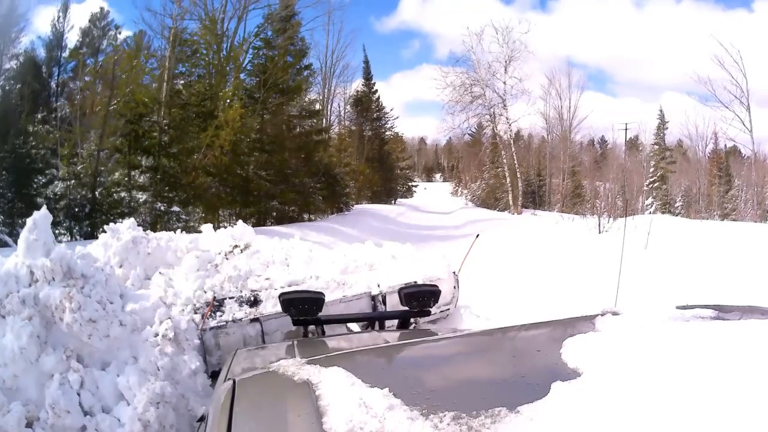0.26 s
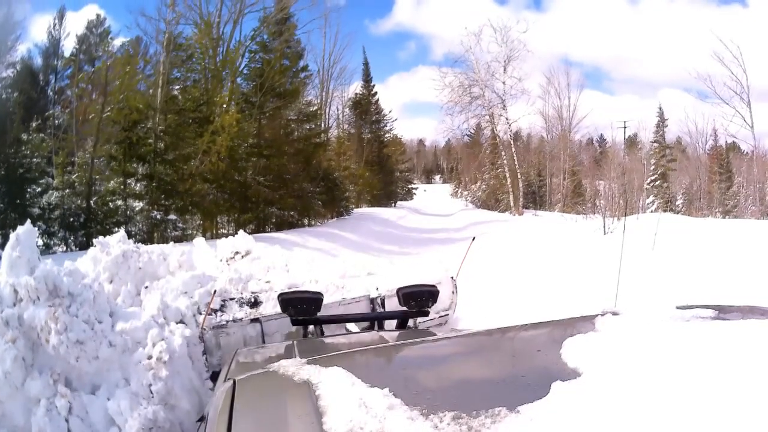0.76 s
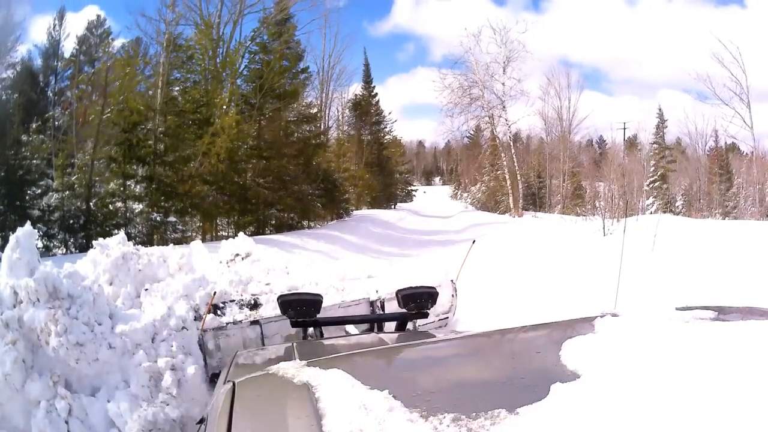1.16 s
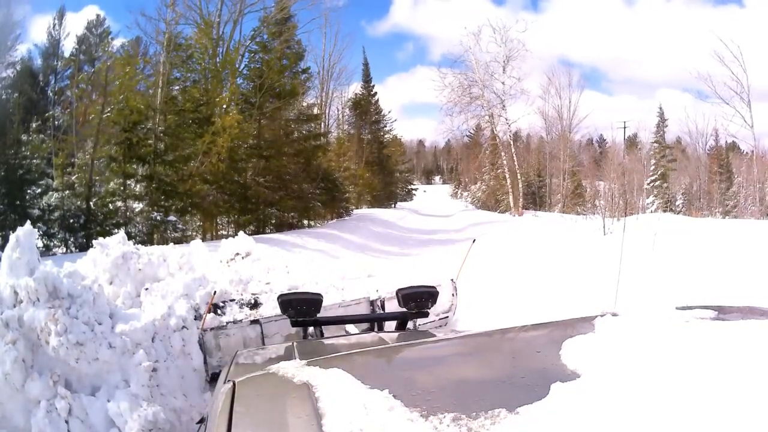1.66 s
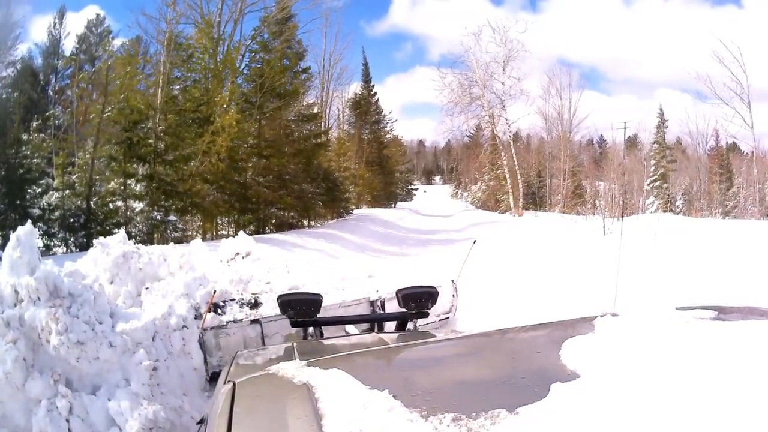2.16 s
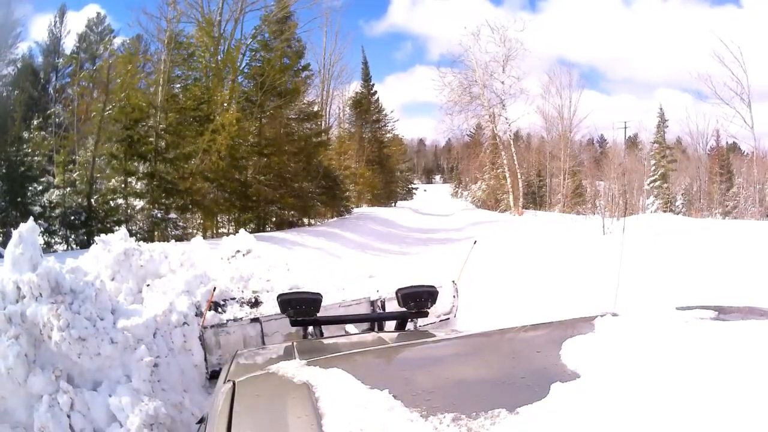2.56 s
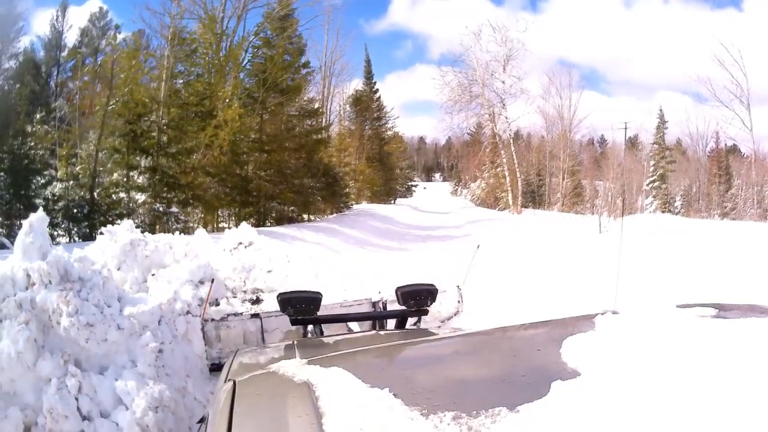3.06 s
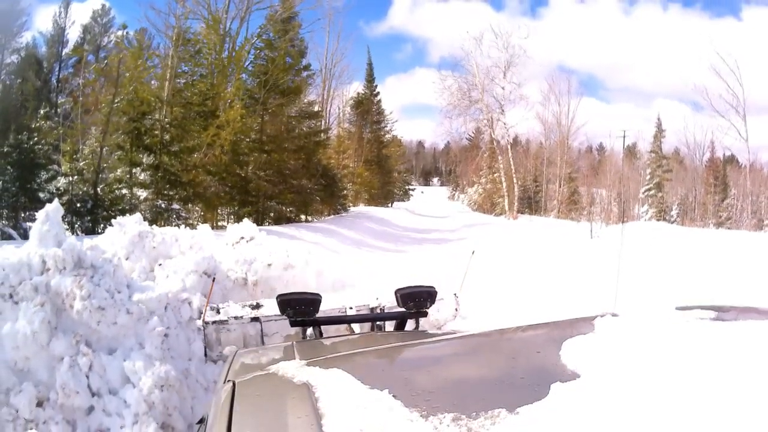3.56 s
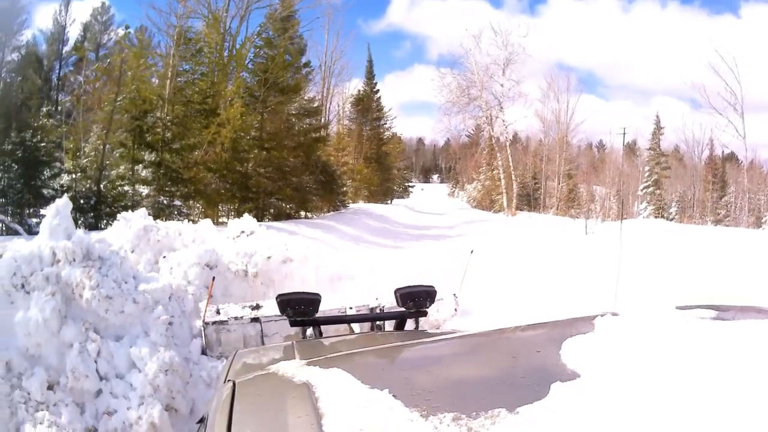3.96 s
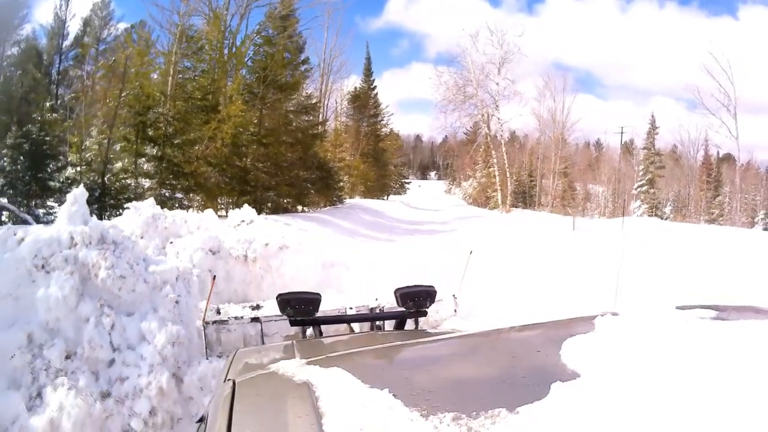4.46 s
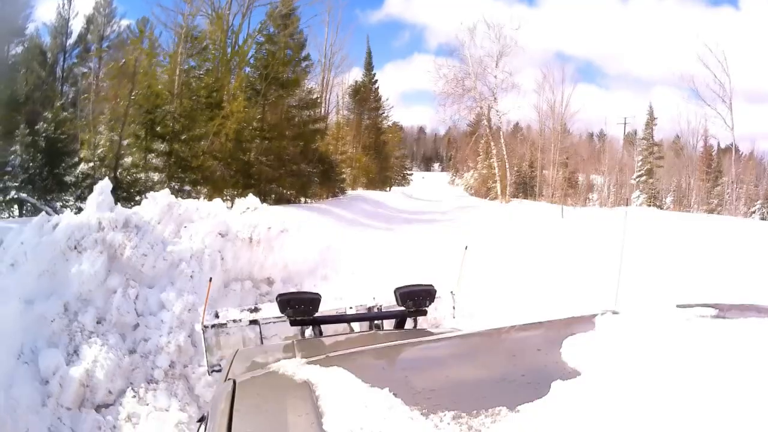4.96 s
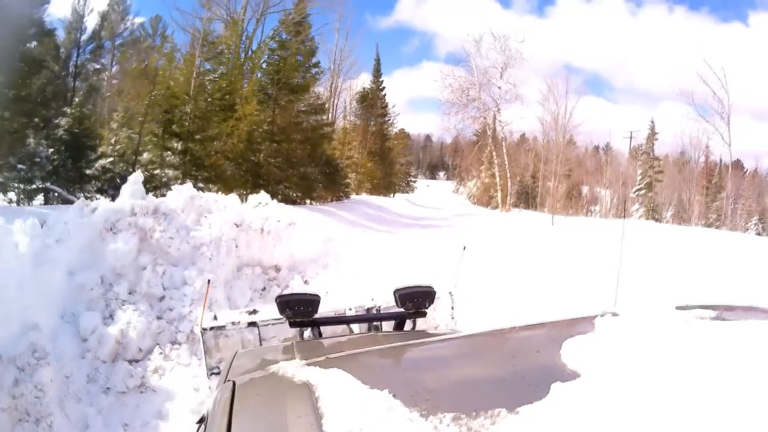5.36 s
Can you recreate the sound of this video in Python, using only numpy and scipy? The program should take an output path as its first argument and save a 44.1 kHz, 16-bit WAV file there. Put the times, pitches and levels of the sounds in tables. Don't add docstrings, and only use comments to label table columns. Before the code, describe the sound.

A truck engine booms under load in a cab while loose plow joints rattle, steel squeaks once, and wet snow thuds against the blade.

```python
import sys
import numpy as np
from scipy import signal
from scipy.fft import rfft, irfft
from scipy.io import wavfile
from scipy.ndimage import uniform_filter1d

SR = 44100
rng = np.random.default_rng(int(sys.argv[2]) if len(sys.argv) > 2 else 0)


def int16_out(signal):
    q = np.round(np.clip(np.atleast_2d(signal).T, -1, 1) * 32767)
    wavfile.write(sys.argv[1], SR, q.astype(np.int16))


def attenuation_scalar(level_db):
    decades = np.asarray(level_db, float) / 20
    return 10 ** decades


N = 247842

# (frequency [Hz], density [dB per Hz])
CAB_COLOUR = [(8.8, -27), (15, 1), (32, -4), (48, 2.5), (76, -7), (140, -8), (313, -9.5), (700, -38),
              (910, -51), (1540, -120)]


def evened(x):
    return x / np.sqrt(np.mean(x ** 2) + 1e-20)


def steadied(x, seconds):
    return evened(x / np.sqrt(uniform_filter1d((x ** 2).mean(0), int(seconds * SR)) + 0.067))


def lumps(seconds):
    width = int(seconds * SR)
    return evened(uniform_filter1d(uniform_filter1d(rng.standard_normal(N), width), width))


def unevenness(shape, width):
    return evened(uniform_filter1d(rng.standard_normal(shape), width))


def read(points, hz):
    f, value = np.transpose(points)
    return np.interp(np.log(hz + 1), np.log(f + 1), value)


def add(mix, s, sound):
    part = mix[:, round(s * SR):][:, :sound.shape[1]]
    part += sound[:, :part.shape[1]]


def resonate(x, hz, width):
    turn = np.exp(2j * np.pi * np.cumsum(hz * np.ones(x.shape[-1])) / SR)
    r = np.exp(-np.pi * width / SR)
    return 2 * (turn * signal.lfilter([1 - r], [1, -r], x / turn)).real


def pair(colour_db, size):
    # (frequency [Hz], left-right likeness [0 to 1])
    likeness = [(60, 0.95), (130, 0.8), (290, 0.83), (640, 0.47), (1410, 0.74), (3100, 0.61), (6820, 0.85),
                (15000, 1)]
    # (frequency [Hz], left over right [dB])
    balance = [(60, 3), (180, 0.7), (550, -4), (1650, -1), (4970, -0.69), (15000, 0.34)]
    hz = np.fft.rfftfreq(size, 1 / SR)
    a, b = rfft(rng.standard_normal((2, size)))
    same = np.clip(read(likeness, hz), 0, 1)
    ports = np.array([a, same * a + np.sqrt(1 - same ** 2) * b])
    ports = ports * attenuation_scalar(colour_db(hz) + [[.5], [-.5]] * read(balance, hz))
    return evened(irfft(ports, size))


def surges(rows):
    t = np.arange(0, N / SR + .002, .001)
    swell_db = sum(db * np.exp(-((t - s) / (0.8 * max(length, .01))) ** 2) for s, db, length in rows)
    return np.interp(np.arange(N) / SR, t, swell_db)


def controls():
    # (time [s], boom pitch [Hz], engine effort [dB], push against the snow [dB])
    load = [(0.0, 38.1, -21.5, -34.5), (0.5, 37.02, -18.5, -34), (0.95, 38.38, -17, -33.5),
            (1.38, 32.52, -18, -33), (1.52, 40, -15, -33.5), (1.77, 52.3, -15.5, -32),
            (2.0, 50.64, -15.5, -32), (2.2, 36, -19, -34), (2.5, 42.57, -14, -37.5),
            (2.83, 44.17, -18, -35.5), (2.99, 32.4, -16, -39.5), (3.24, 36.1, -15.5, -41),
            (3.37, 41.13, -17.5, -38.5), (3.94, 43.7, -19.5, -39.5), (4.269, 37.63, -23.5, -40),
            (4.65, 44.86, -27, -38), (4.93, 57.6, -24, -40.5), (5.62, 44.5, -22, -38.5)]
    # (time [s], extra boom [dB], length [s])
    lurches = [(.19, 8, 0.11), (.47, 6, .05), (.64, 3, .08), (.77, -2.5, 0.11), (1.22, 3, .15),
               (2.11, 9, 0.087), (2.5, 6, 0.054), (2.62, -0.5, 0.11), (2.92, 7.5, 0.075), (2.99, -5, 0.045),
               (3.09, 3.5, .06), (3.14, -7, .04), (3.24, 4.5, 0.043), (3.3, -9, .04), (3.38, 9.5, 0.11),
               (4.22, -9, .06), (4.52, -13, 0.061), (4.77, 4, 0.055), (4.84, -1, 0.053), (4.93, 2, .05),
               (4.98, -5, 0.047), (5.2, 4.5, 0.18), (5.48, 2.5, 0.084)]
    # (time [s], extra drumming [dB], length [s])
    slumps = [(.77, 1.5, 0.057), (1.1, 0.5, 0.15), (1.44, 6.5, 0.031), (1.98, 1, 0.065), (2.45, 5.5, 0.076),
              (2.6, 7, 0.12), (2.72, 5, 0.091), (2.83, 8, 0.099), (2.96, 7.5, .12), (3.13, 8, 0.07),
              (3.3, 5.5, 0.085), (3.7, 2.5, .08), (4.27, 2.5, 0.086), (4.55, 2.5, 0.088), (4.85, 5, 0.035),
              (5.48, 4.5, 0.062)]
    s, *columns = np.transpose(load)
    hz, effort_db, push_db = (np.interp(np.arange(N) / SR, s, c) for c in columns)
    heap_db = surges(slumps)
    boom_db = effort_db + surges(lurches)
    drum_db = push_db + 13.5 + heap_db
    drum_hz = 112 + 4 * heap_db
    clatter_db = push_db + .35 * heap_db
    return hz, boom_db, drum_db, drum_hz, clatter_db


def hiss():
    return attenuation_scalar(-61.0) * pair(lambda f: -30 * (f < 3000) - 1.64 * f / 1000, N)


def crumbs():
    out, t = np.zeros((2, N)), np.arange(1500) / SR
    for centre_hz in np.geomspace(600, 3500, 8):
        hits = rng.random(N) < 14 / SR
        size = attenuation_scalar(3.0 * np.minimum(rng.exponential(1, N), 3)) * hits
        grain = pair(lambda f: -7.5 * np.log2(f / centre_hz + 1e-3) ** 2, 1500)
        grain = grain * t / .003 * np.exp(-t / 0.0055)
        out += signal.oaconvolve(size[None], grain * 600 / centre_hz)[:, :N]
    *_, clatter_db = controls()
    return evened(out) * attenuation_scalar(clatter_db - 5.5)


def crunch(db, hz, t60):
    t = np.arange(5000) / SR
    cracks = rng.standard_normal((2, 5000)) * (rng.random(5000) < 1500 / SR)
    shared = cracks[:1] + .4 * cracks
    ring = evened(resonate(resonate(shared, hz, .22 * hz), hz, .3 * hz))
    return attenuation_scalar(db - 5.0 - 60 * t / np.clip(t60, .02, .3)) * np.minimum(t / .0025, 1) * ring


def crunches(mix):
    # (time [s], peak [dB], pitch [Hz], t60 [s])
    cracks = [(.2613, -27, 1030, .06), (.341, -20, 3400, .05), (.341, -20, 1100, .06),
              (.4735, -20, 2500, .06), (.5741, -25, 800, .06), (1.0106, -26, 980, .06),
              (1.4087, -25, 1400, .06), (1.4496, -18, 900, .06), (1.6043, -14, 1000, .1),
              (1.672, -20, 1300, .08), (1.705, -19, 7300, .08), (1.706, -18, 4080, .07),
              (1.718, -30, 5000, .12), (1.74, -28, 2500, .08), (2.06, -26, 3500, .05),
              (2.1031, -23, 900, .07), (2.359, -24, 720, .05), (2.4329, -24, 1170, .06),
              (2.486, -21, 900, .07), (2.537, -28, 2200, .05), (2.683, -28, 1600, .05),
              (2.7122, -28, 1090, .06), (2.7335, -24, 1000, .07), (2.75, -31, 2150, .12),
              (2.781, -32, 4000, .04), (2.803, -31, 3000, .05), (2.828, -31, 2050, .08),
              (2.9168, -27, 1200, .05), (3.11, -8, 310, .1), (3.31, -11, 270, .1), (3.967, -30, 3500, .04),
              (4.345, -16, 700, .07), (4.885, -19, 1100, .08), (4.925, -21, 600, .15), (5.0, -22, 500, .12),
              (5.128, -33, 1300, .1), (5.225, -30, 2200, .06), (5.245, -24, 2600, .08),
              (.034, -20, 2100, .1), (.768, -19, 1510, .07), (2.379, -17, 1530, .06),
              (3.695, -13, 1550, .06), (4.316, -20, 4300, .05), (1.812, -38, 6000, .08),
              (3.633, -32, 3000, .05), (3.815, -36, 4500, .04), (2.978, -39, 3700, .04),
              (3.102, -27, 2500, .06), (5.48, -33, 3200, .05), (.855, -28, 2100, .08)]
    for s, *crack in cracks:
        add(mix, s, crunch(*crack))


def squeak(mix):
    # (time [s], pitch [Hz], level [dB])
    path = [
        (1.622, 2950, -30),
        (1.628, 2975, -18),
        (1.634, 2990, -20),
        (1.638, 3200, -17),
        (1.652, 3260, -23),
        (1.658, 2960, -17),
        (1.673, 2950, -19),
        (1.68, 3200, -28),
        (1.695, 3180, -40),
    ]
    # (multiple of the pitch [1], level [dB])
    orders = [(1, -4), (2, -1), (3, -4), (4, -28)]
    s, hz, db = np.transpose(path)
    t = np.arange(s[0], s[-1], 1 / SR)
    waver = 1 + 0.022 * unevenness(8000, 60)[:len(t)]
    turns = np.cumsum(np.interp(t, s, hz) * waver) / SR
    grip = attenuation_scalar(3.9 * unevenness((4, 8000), 70)[:, :len(t)])
    tone = sum(attenuation_scalar(level_db) * grip[round(k) - 1] * np.sin(2 * np.pi * round(k) * turns)
               for k, level_db in orders)
    add(mix, s[0], np.array([1.05, .95])[:, None] * attenuation_scalar(np.interp(t, s, db)) * tone)


def scrape(start, end, db, centre_hz, octaves):
    t = np.arange(0, end - start, 1 / SR)

    def colour_db(f):
        hump = -6.5 * (np.log2(f / centre_hz + 1e-3) / octaves) ** 2
        return hump - 5.5 * np.maximum(f / 1000 - 11.3, 0)

    grains = pair(colour_db, 4096) * attenuation_scalar(2 * unevenness(4096, 160))
    fade = np.minimum((t[-1] - t) / (0.38 * t[-1]), 1) ** 2
    return attenuation_scalar(db) * grains[:, :len(t)] * np.minimum(t / 0.0057, 1) * fade


def scrapes(mix):
    # (start [s], end [s], level [dB], colour centre [Hz], colour width [octaves])
    drags = [(0.34, 0.35, -29.5, 8500, 0.33), (1.073, 1.104, -36, 7650, 0.51),
             (1.406, 1.423, -46, 8000, 0.69), (1.424, 1.487, -27, 2380, 1.5),
             (1.591, 1.65, -22, 2250, 1.65), (1.64, 1.701, -26, 6050, 0.71),
             (1.663, 1.698, -23, 1700, 0.96), (1.699, 1.733, -23, 4180, 0.22),
             (1.698, 1.73, -26.5, 7260, 0.48), (2.126, 2.139, -37.5, 9010, 0.31),
             (4.567, 4.591, -45, 7910, 0.41), (4.866, 4.892, -27.5, 1820, 1),
             (0.045, 0.07, -31.5, 1780, 1.04), (0.452, 0.463, -44, 1590, 0.69),
             (4.474, 4.492, -38.5, 1790, 1.05), (4.579, 4.599, -38, 1790, 0.79),
             (5.463, 5.505, -41, 2495, 1.46), (5.138, 5.201, -50, 8430, 0.55),
             (5.205, 5.255, -45, 10900, 1.5), (5.246, 5.276, -31.5, 1383, 0.6),
             (4.847, 4.876, -43.5, 6000, 1.16), (5.426, 5.448, -46, 7247, 0.45)]
    for row in drags:
        add(mix, row[0], scrape(*row))


def rattle(db, treble_db, body_db, ring_hz, t60):
    t, t60 = np.arange(6000) / SR, np.clip(t60, .02, .4)
    # (frequency [Hz], level [dB])
    middle_colour = [(700, -68), (1000, 6), (2500, -3.5), (5000, -17), (7000, -53)]
    treble_colour = [(4000, -34), (5200, -6.0), (9000, -5.5), (12000, -19.0), (16000, -29)]
    body_colour = [(330, -16), (480, 13), (950, 4.5), (1300, -60.0)]
    middle = pair(lambda f: read(middle_colour, f), 6000)
    rings = resonate(middle, ring_hz, 140)
    for k in rng.uniform(0.91, 3.38, 2):
        rings = rings + 1.04 * resonate(middle, ring_hz * k, 330)
    middle = evened(middle + 0.8 * evened(rings))
    treble = attenuation_scalar(treble_db + 5.0 - 25 * t / t60) * pair(lambda f: read(treble_colour, f), 6000)
    body = attenuation_scalar(np.minimum(body_db, 3) + 3.5) * pair(lambda f: read(body_colour, f), 6000)
    chatter = attenuation_scalar(2.0 * np.minimum(t / 0.014, 1) * unevenness(6000, 220))
    onset = 0.011 * t60 * attenuation_scalar(-.4 * (db + 22.0))
    return attenuation_scalar(db - 7.0 - 60 * t / t60) * (1 - np.exp(-t / onset)) * chatter * (middle + treble + body)


def rattles(mix):
    # (time [s], peak [dB], treble share [dB], t60 [s])
    hitch = [(.6564, -19, -21, .11), (.83, -26, -25, 0.18), (.9572, -25, -17, 0.079),
             (1.1029, -10.5, -25, 0.086), (1.9753, -24, -32, 0.34), (2.2248, -17, -24, 0.09),
             (2.4647, -22, -37, 0.13), (2.6264, -29, -29, 0.07), (2.7331, -26, -29, 0.096),
             (3.5074, -23, -21, 0.11), (3.7378, -20.5, -22, 0.077), (3.8147, -31.5, -18, 0.16),
             (3.9543, -29, -11, 0.058), (4.8703, -16, -24, 0.12), (4.9795, -20.5, -18, 0.065),
             (2.129, -29, -8, .1), (3.6949, -9.5, -20, 0.045), (5.2359, -15.5, -8, 0.04),
             (5.5253, -13.5, -12, 0.11)]
    chain = [(.0298, -16, -22, 0.14), (.4768, -10, -25, 0.05), (.62, -24, -26, .17), (.6789, -23, -20, .11),
             (1.038, -28, -15, .16), (1.06, -10, -20, .064), (1.1159, -11, -17.5, .076),
             (2.2587, -21.5, -19, 0.14), (2.7805, -22, -17, .11), (2.8479, -23.5, -23, 0.16),
             (3.078, -16, -19, 0.16), (3.5577, -20.5, -19, .11), (3.7817, -23.5, -23, 0.081),
             (3.8715, -30, -18, 0.097), (3.9239, -24, -23, 0.08), (3.9658, -23.5, -22, .1),
             (4.1743, -22, -21, 0.071), (4.9192, -28, -35, .11), (5.0329, -46, 12, .04),
             (5.3442, -27, -17, 0.23), (3.198, -28, -20, 0.11), (3.246, -28, -16, 0.085),
             (3.288, -27, -16, 0.08), (3.324, -27, -29, 0.12)]
    bracket = [(.2902, -19.5, -20, 0.087), (.4279, -20, -20, 0.24), (.7402, -23.5, -29, .16),
               (.7682, -12.5, -26, 0.078), (1.9205, -22.5, -31, .11), (2.0696, -13.5, -27, 0.042),
               (2.3779, -13, -19.5, 0.094), (2.5435, -22, -17, 0.084), (2.6428, -17.5, -23, 0.064),
               (3.022, -27, -16, 0.092), (4.316, -12, -19, 0.075), (4.7406, -28.5, -23, 0.1),
               (5.2364, -21, -19, 0.14), (.3262, -17, -21, 0.26), (.3721, -16.5, -18.5, 0.096),
               (.9323, -14, -23, 0.18), (2.1769, -19, -23, 0.062), (2.5555, -19.5, -22, 0.07),
               (3.5832, -20.5, -21, 0.18), (4.2277, -16.5, -20, 0.059)]
    spring = [
        (.1665, -22.5, -12, 0.18),
        (1.4122, -28.5, -2, 0.21),
        (1.8202, -17, -13.5, 0.087),
        (4.2472, -15.5, -26, 0.11),
    ]
    # (slaps, body share [dB], ring [Hz])
    joints = [(hitch, 0.96, 1070), (chain, -5.5, 1210), (bracket, -2, 1560), (spring, -8, 2140)]
    for slaps, body_db, ring_hz in joints:
        for s, db, treble_db, t60 in slaps:
            add(mix, s, rattle(db, treble_db, body_db, ring_hz, t60))


def clonk(db, hz, t60, pan_db):
    t = np.arange(12000) / SR
    rise = np.sin(np.pi / 2 * np.minimum(t * hz / 2.5, 1)) ** 2
    phase = 2 * np.pi * rng.random((2, 2))
    ring = np.sin(2 * np.pi * hz * t + 0.56 * phase[:, :1] / np.pi)
    ring = ring + 0.67 * np.sin(2 * np.pi * hz * 1.09 * t + phase[:, 1:])
    side_db = np.clip(pan_db, -6, 6) * np.array([[.5], [-.5]])
    return attenuation_scalar(db - 2.5 - 60 * t / np.clip(t60, .02, .6) + side_db) * rise * ring


def clonks(mix):
    # (time [s], peak [dB], pitch [Hz], t60 [s], left over right [dB])
    knocks = [(0.327, -10, 500, 0.091, 6), (1.1, -3.5, 230, 0.1, 7), (2.722, -0.5, 188, 0.14, -2),
              (3.112, 8, 173.5, 0.07, 8), (3.2, -7, 125, .12, 1), (3.308, -4, 190, 0.1, -1),
              (3.385, -8, 95, .2, 1), (3.693, -4.5, 165, 0.085, -1), (3.734, -15, 410, 0.11, 2),
              (4.308, -3, 110, 0.1, 3), (4.343, -6, 400, 0.05, 6), (4.848, -7.5, 231.9, 0.15, 5),
              (4.978, -5, 310, 0.059, 5), (5.529, -18.5, 514, 0.17, -7),
              (0.326, -9.5, 1730, 0.039, -5), (0.657, -19, 896, 0.057, 1), (1.423, -26, 2090, 0.054, -5),
             (.828, -2.5, 544, 0.056, 14), (4.612, -1.5, 369.5, 0.14, 0.5), (4.641, -10, 412, 0.13, -5),
             (4.978, -7.5, 453, 0.074, 2), (2.486, -12.5, 518, 0.055, 1), (3.694, -1, 930, 0.03, -2),
             (1.1, -6, 520, 0.07, 0), (3.738, -11, 717, 0.056, -2), (4.316, -14.5, 1497, 0.042, -5),
             (4.316, -8, 890, 0.022, -17), (3.126, 2, 160, 0.14, -2), (3.121, -19, 303, 0.16, -5),
             (4.849, -21, 870, 0.085, -9), (4.85, -5, 454, 0.055, -3), (4.917, -23.5, 1130, 0.13, -2),
             (5.527, -16, 4380, 0.027, 1)]
    for s, *blow in knocks:
        add(mix, s, clonk(*blow))


def snow_drum(drum_db, drum_hz):
    def colour_db(f):
        return read(CAB_COLOUR, f) - 40 * (f < 70) - 14 * np.clip(np.log2(f / 420 + 1e-9), 0, 3)

    drum = pair(colour_db, N)
    blade = 0.58 * resonate(drum, drum_hz, 45)
    panel = 0.36 * resonate(drum, 354.0, 42.0)
    drum = evened(drum + blade + panel)
    return steadied(drum, 0.052) * attenuation_scalar(drum_db + 2.04 * lumps(0.014) + 0.25)


def engine(hz, boom_db, clatter_db):
    # (frequency [Hz], density [dB per Hz])
    clatter_colour = [(240, -27), (400, 1), (569, 0), (685, -5), (1150, -13), (1290, -18), (1720, -17.5),
                      (4260, -29), (5200, -34), (8120, -31), (15700, -42.5)]
    turns = np.cumsum(hz * (1 + 0.0527 * lumps(0.026))) / SR
    shake = steadied(pair(lambda f: read(CAB_COLOUR, f) - 40 * (f > 70), N), 0.08)
    firing = np.sqrt(2) * np.sin(2 * np.pi * turns) * attenuation_scalar(0.42 * lumps(0.029))
    firing = firing * attenuation_scalar([[1.], [-1.]])
    boom = attenuation_scalar(boom_db) * evened(0.6 * firing + 0.75 * shake)
    ticking = attenuation_scalar(0.99 * lumps(0.0063) + 0.5 * np.cos(2 * np.pi * turns))
    clatter = pair(lambda f: read(clatter_colour, f) - 40 * (f < 400), N)
    return boom + clatter * ticking * attenuation_scalar(clatter_db + 0.5)


def scene():
    hz, boom_db, drum_db, drum_hz, clatter_db = controls()
    mix = hiss() + crumbs() + snow_drum(drum_db, drum_hz) + engine(hz, boom_db, clatter_db)
    for layer in (crunches, squeak, scrapes, rattles, clonks):
        layer(mix)
    return mix


def roll_off(x):
    return signal.sosfilt(signal.butter(12, 15860, fs=SR, output="sos"), x)


def record(dry):
    limited = signal.oaconvolve(dry, signal.firwin(255, 15800, fs=SR)[None], "same")
    return roll_off(np.clip(limited, -1, 1))


dry = scene()
out = record(dry)
int16_out(out)
```